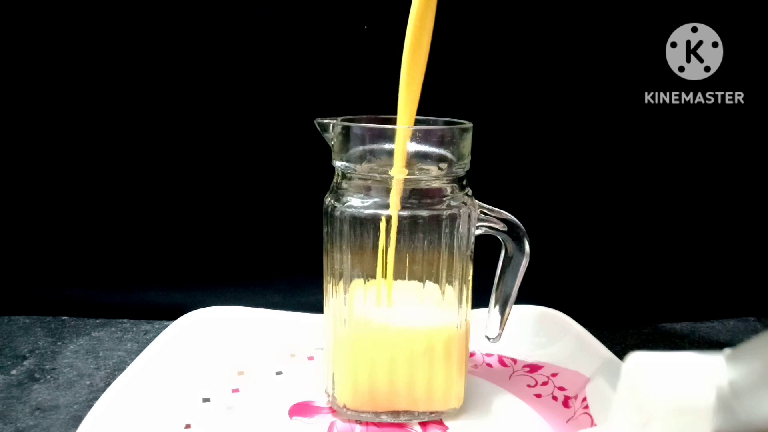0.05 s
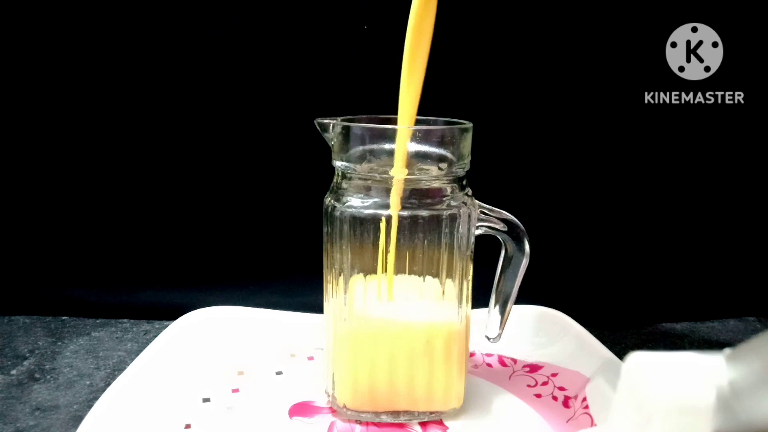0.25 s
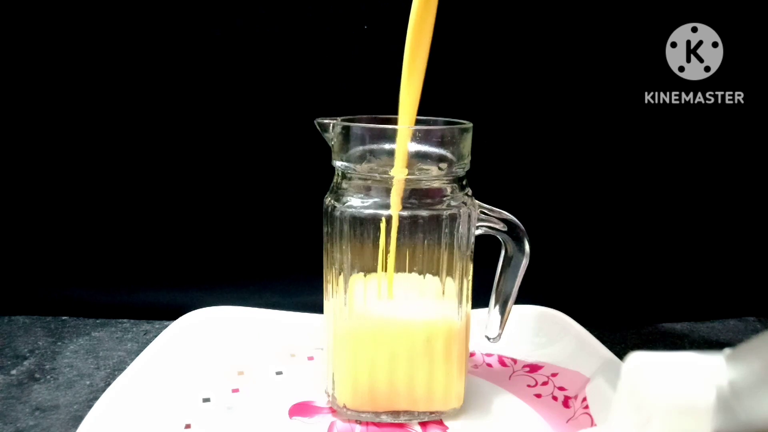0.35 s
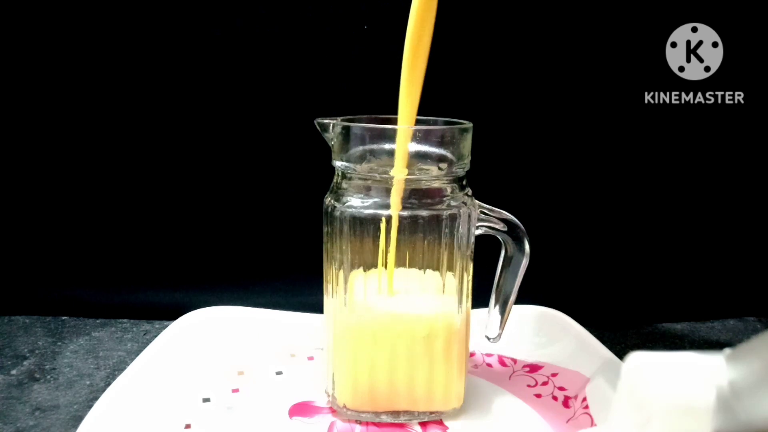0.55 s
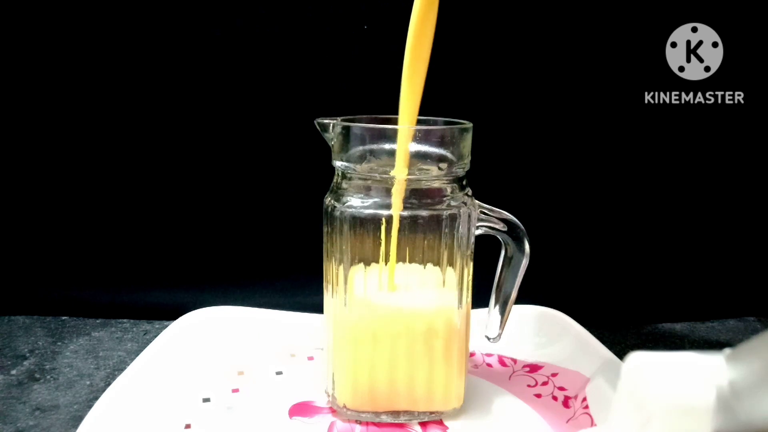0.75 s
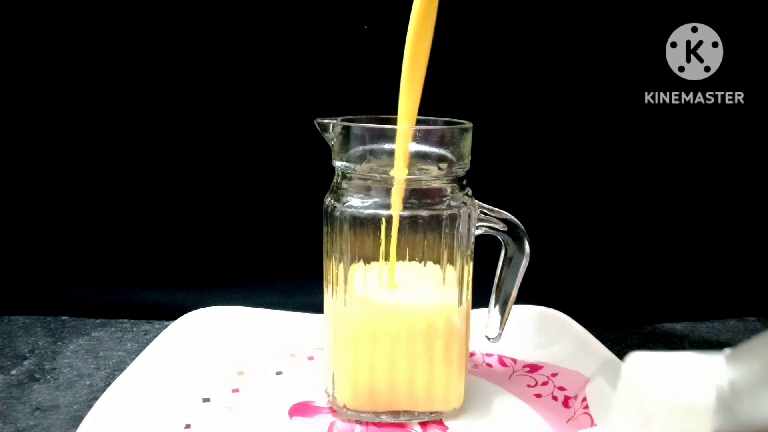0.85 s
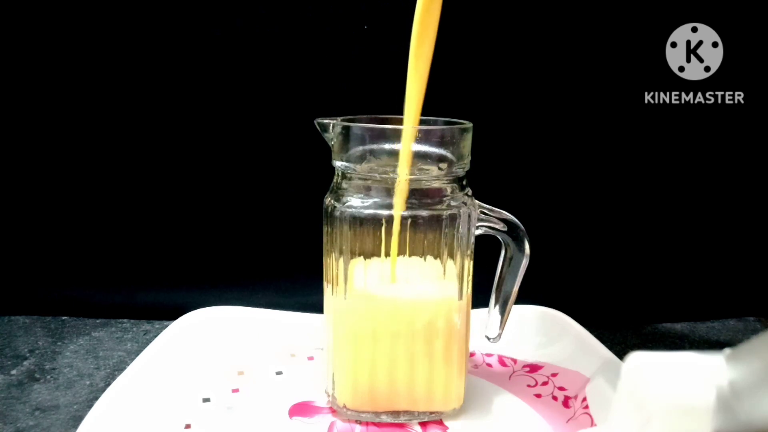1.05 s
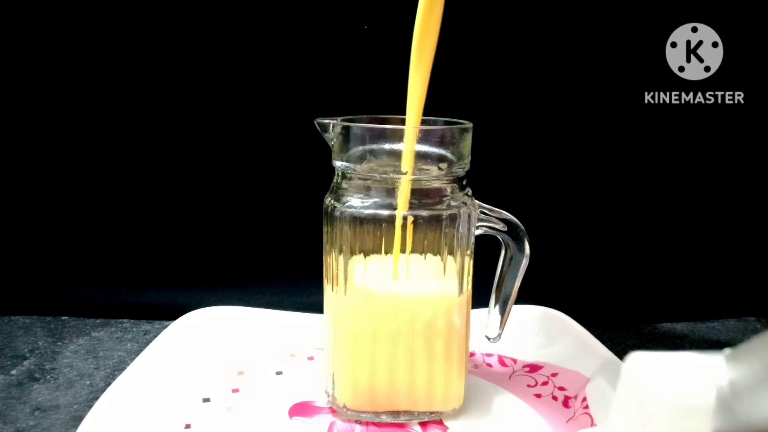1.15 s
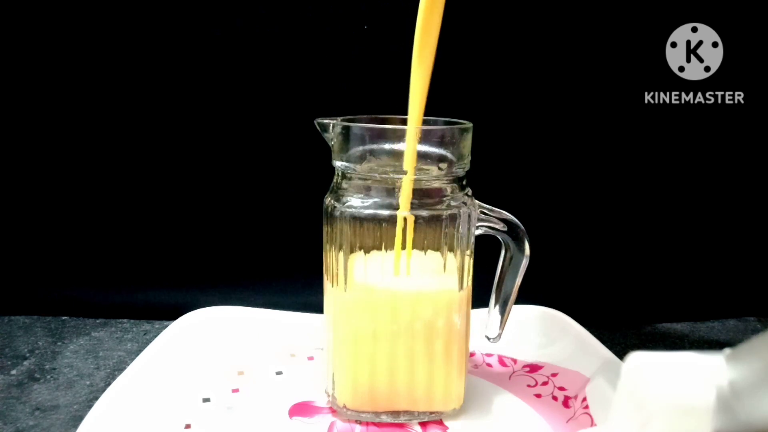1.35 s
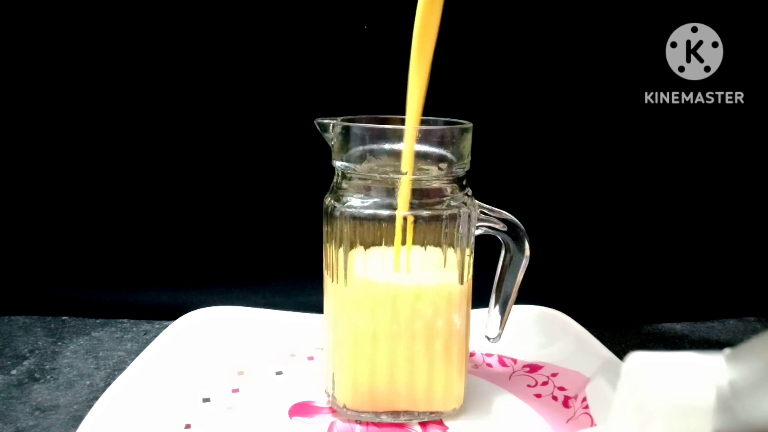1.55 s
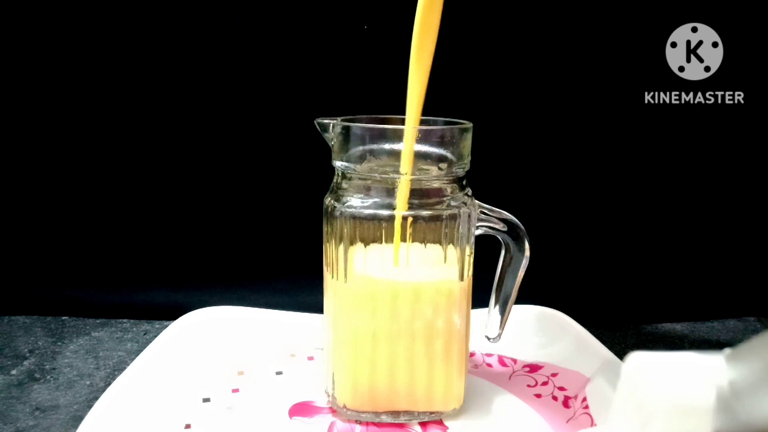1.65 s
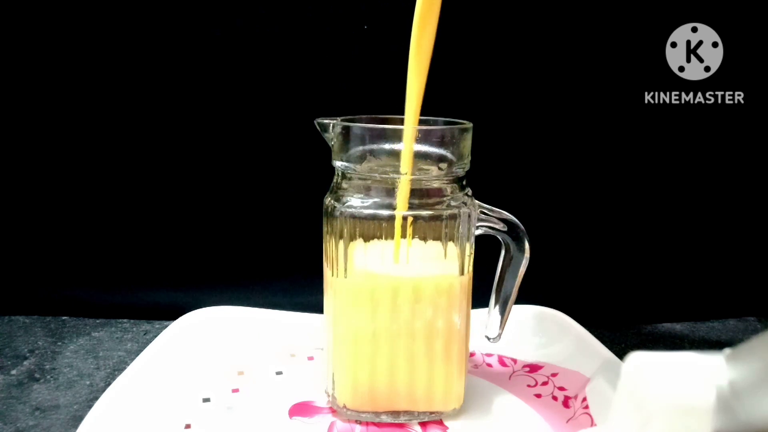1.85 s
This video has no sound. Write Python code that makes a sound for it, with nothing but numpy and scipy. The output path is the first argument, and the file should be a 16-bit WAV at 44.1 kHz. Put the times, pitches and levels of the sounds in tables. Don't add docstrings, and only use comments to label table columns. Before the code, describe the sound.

A thick drink pours into a glass jug, close and dry. Only tiny drips until 0.2 s, then a loud cluster of hollow glugs and bright pops at 0.25-0.35. A brief lull near 0.4, sharp wet snaps at 0.5, 0.78 and 0.93, then rounder gulps and churning around 1.0-1.15. Softer, sparse plops, ticks and glassy trickling continue to 1.9 s over faint hum and hiss.

```python
import sys
import numpy as np
from scipy import signal
from scipy.io import wavfile
from scipy.ndimage import uniform_filter1d

SR = 44100
rng = np.random.default_rng(int(sys.argv[2]) if len(sys.argv) > 2 else 0)


def dump_mix(stems):
    frames = np.atleast_2d(stems).T
    limited = np.clip(frames, -1, 1)
    pcm = np.round(limited * 32767).astype(np.int16)
    wavfile.write(sys.argv[1], SR, pcm)


def invert_db(level):
    return 10 ** (np.asarray(level, dtype=float) / 20)


N = 83790

# (time [s], peak level [dB], pitch [Hz], t60 [s])
GULPS = [(0.2612, -17, 1184, 0.094), (0.318, -25.5, 807, 0.062), (0.329, -13.5, 746, 0.015),
         (0.332, -16.5, 3120, 0.028), (0.343, -13, 692, 0.06), (0.37, -20, 737, 0.044),
         (0.496, -14.5, 968, 0.048), (0.694, -30.5, 1160, 0.036), (1.066, -17.5, 950, 0.049),
         (1.098, -27, 910, 0.037), (1.146, -12.5, 1012, 0.058), (1.226, -33.5, 1140, 0.13),
         (1.317, -34.5, 1216, 0.2), (1.377, -34.5, 1078, 0.061), (1.396, -29, 1018, 0.051),
         (1.412, -31, 1000, 0.035), (1.476, -25.5, 1020, 0.016), (1.49, -21.5, 1050, 0.0091),
         (1.506, -28, 1010, 0.011), (1.547, -24, 1067, 0.02), (1.58, -27.5, 1050, 0.02),
         (1.611, -28.5, 1160, 0.03), (1.629, -28.5, 1076, 0.11)]
# (time [s], peak level [dB], pitch [Hz])
PLOPS = [(0.0014, -25, 1546), (0.192, -26.5, 2080), (0.247, -20, 1683), (0.5665, -32.5, 1470),
         (0.6209, -32, 1750), (0.7771, -19, 1955), (0.7817, -20.5, 1481), (0.822, -41, 1590),
         (0.853, -30, 1550), (0.874, -42, 1420), (0.8952, -28, 1487), (0.9414, -22.5, 1590),
         (1.0213, -26.5, 1446), (1.037, -24.5, 2340), (1.068, -32, 1800), (1.094, -34, 1490),
         (1.1454, -19, 1431), (1.195, -38, 1050), (1.22, -40, 1570), (1.3944, -30.5, 1707),
         (1.4565, -32, 1320), (1.5956, -29.5, 1414), (1.6281, -25.5, 1547), (1.755, -40, 1980),
         (1.82, -38, 2550), (1.869, -33, 1110)]
# (time [s], peak level [dB], pitch [Hz])
POPS = [(0.1441, -28.5, 4480), (0.2455, -12.5, 3630), (0.2839, -14, 3600), (0.2982, -19.5, 4020),
        (0.3281, -0.5, 3560), (0.522, -35, 3200), (0.5366, -19, 3300), (0.5426, -18.5, 2890),
        (0.617, -19.5, 2550), (0.6685, -29, 4200), (0.6828, -26.5, 2670), (0.724, -30, 4340),
        (0.7326, -32, 2900), (0.759, -25, 3070), (0.7785, -5.5, 3560), (0.8386, -27, 2940),
        (0.8846, -22, 4860), (0.909, -21, 5130), (0.96, -30.5, 3480), (1.018, -26, 3600), (1.04, -26, 3030),
        (1.0905, -49, 2870), (1.1306, -31.5, 2850), (1.1454, -19.5, 3420), (1.1745, -24.5, 3140),
        (1.227, -28, 2840), (1.278, -32, 4600), (1.319, -43, 3100), (1.337, -56, 3070),
        (1.3512, -22.5, 3420), (1.376, -39, 3100), (1.412, -34, 2840), (1.4567, -25.5, 3030),
        (1.476, -18, 3300), (1.5305, -34, 3600), (1.5474, -33, 4000), (1.58, -51, 3070),
        (1.5963, -25.5, 3103), (1.648, -36, 2980), (1.6552, -26.5, 3370), (1.672, -30, 4280),
        (1.7262, -29, 3300), (1.752, -30, 3460), (1.859, -39, 3160), (1.8904, -23.5, 3300)]
# (time [s], peak level [dB], pitch [Hz])
SNAPS = [(0.2463, -20.5, 5300), (0.2839, -26.5, 5300), (0.3274, -12.5, 6020), (0.4281, -23.5, 9710),
         (0.5057, -37, 15300), (0.5071, -10.5, 6870), (0.5349, -19, 7500), (0.6447, -21.5, 6600),
         (0.6803, -30, 8930), (0.6999, -29, 5400), (0.7621, -29.5, 7900), (0.7796, -10, 5230),
         (0.84, -35, 5750), (0.8917, -24.5, 5700), (0.9102, -26, 8500), (0.9259, -8.5, 7640),
         (0.9962, -18.5, 9900), (1.0915, -27, 11040), (1.1245, -19, 13600), (1.2378, -32.5, 7450),
         (1.251, -27, 14100), (1.4883, -24.5, 12500), (1.5987, -27.5, 11700), (1.8035, -29, 11960),
         (1.8778, -35.5, 13400),
         (0.0113, -35.5, 9460), (0.0353, -38, 6670), (0.073, -43.5, 5100), (0.0988, -32, 6050),
         (0.19, -25.5, 7870), (0.1967, -28.5, 11000), (0.304, -22.5, 7100), (0.3338, -16, 5720),
         (0.379, -28.5, 9200), (0.4, -41, 10100), (0.464, -31, 14000), (0.5449, -21.5, 7700),
         (0.8078, -30.5, 7040), (0.9457, -23.5, 11500), (1.0047, -21.5, 9824), (1.1965, -32.5, 9000)]
# (time [s], peak level [dB], pitch [Hz])
SPRAY_TICKS = [(.022, -40, 12000), (.042, -45, 10300), (.083, -46, 8300), (.139, -36.5, 10600),
               (.172, -62, 13300), (.218, -37, 6600), (.2455, -18, 10600), (.2828, -21, 10600),
               (.3272, -10, 12100), (.5062, -9, 12500), (.531, -26, 11000), (.5365, -14, 11400),
               (.548, -25, 12100), (.557, -32, 11000), (.575, -37, 11000), (.649, -44, 13500),
               (.676, -28, 10900), (.725, -32, 8700), (.7387, -30.5, 9800), (.7665, -26, 12700),
               (.9612, -28, 12100), (1.04, -32.5, 9300), (1.0725, -50, 11100), (1.1433, -20.5, 9100),
               (1.18, -46, 12200), (1.2356, -38, 11500), (1.29, -35, 9400), (1.3194, -36.5, 10700),
               (1.3379, -50, 13600), (1.435, -44, 11500), (1.515, -39, 11300), (1.547, -44, 12100),
               (1.569, -43, 13100), (1.608, -48, 10850), (1.6387, -31.5, 10300), (1.648, -46, 12100),
               (1.714, -42.5, 14100), (1.761, -37.5, 13500), (1.857, -44, 11800)]
# (time [s], level [dB], start pitch [Hz], length
# [s], end pitch [Hz])
AIR_NECKS = [(0.245, -30.5, 720, 0.066, 790), (0.28, -15.5, 1160, 0.0076, 2400),
             (0.422, -36, 37, 0.1395, 38.4), (0.516, -38.5, 939, 0.09, 900), (0.565, -31, 912, 0.041, 1584),
             (0.595, -45, 1900, 0.013, 2400), (0.661, -53, 1830, 0.038, 1654),
             (0.527, -46.5, 3000, 0.076, 3050), (.729, -35, 1380, 0.012, 1830),
             (0.742, -36, 1570, 0.0084, 1700), (0.547, -52, 1570, 0.036, 1390),
             (0.7, -30, 1134, 0.02, 1240), (0.7, -42.5, 1865, 0.022, 2080),
             (1.001, -37.5, 1210, 0.027, 1390), (1.035, -26, 1255, 0.04072, 873),
             (1.128, -34, 921, 0.081, 1059), (1.6, -36.5, 715, 0.058, 634), (1.706, -42.5, 693, 0.085, 806),
             (1.783, -44.5, 1120, 0.116, 1348)]
# (time [s], level [dB])
SPLASH_VIGOUR = [(0, -58), (0.218, -60), (.26, -51.5), (.39, -46), (0.419, -81), (.49, -51), (.54, -42.5),
                 (.66, -54), (.76, -46.5), (.98, -41.5), (1.039, -33.5), (1.2, -46), (1.43, -47.5),
                 (1.621, -40), (1.69, -60), (1.74, -44.5), (1.9, -46)]
# (frequency [Hz], width [Hz], level [dB])
JUG_MODES = [(665, 130, -8), (1004, 66.7, 3.5), (1560, 670, 1.5), (3100, 90, 9.5), (3560, 154, 1.5)]
# (frequency [Hz], level per Hz [dB])
FLOOR_SPECTRUM = [(15, -37), (30, 6.5), (141, 12.5), (833, -5.5), (1090, -10), (3190, -16), (6590, -38.5),
                  (13300, -22), (16000, -28)]


def bubbles(rows, tick_db):
    rise_per_t60, attack_cycles, tick_s = 0.031, 0.35, 0.0006
    out, t = np.zeros(N), np.arange(SR // 5) / SR
    tick_len = SR // 100
    ticks = rng.standard_normal((len(rows), tick_len)) * np.exp(-t[:tick_len] / tick_s)
    for (s, db, hz, t60), tick in zip(rows, ticks):
        shape = (1 - np.exp(-t * hz / attack_cycles)) * invert_db(-60 * t / t60)
        ring = np.sin(2 * np.pi * hz * (t + rise_per_t60 * t * t / t60))
        add(out, s, invert_db(db) * shape / shape.max() * ring)
        width_hz = 1500 + 0.98 * hz
        coloured = resonate(tick, min(1.28 * hz, 14500), width_hz)
        coloured = resonate(coloured, min(1.29 * hz, 14500), width_hz)
        add(out, s, invert_db(db + tick_db) * (coloured + 0.091 * np.gradient(tick)))
    return out


def by_cycles(rows, cycles):
    return [(s, db, hz, cycles / hz) for s, db, hz in rows]


def air_necks():
    out = np.zeros(N)
    waver, wobble = invert_db(4.1 * drift(105)), 1 + 0.033 * drift(70)
    for s, db, hz, length, end_hz in AIR_NECKS:
        age = np.arange(int(length * SR)) / (length * SR)
        pitch = hz + (end_hz - hz) * age ** 1.805
        pitch = pitch * wobble[int(s * SR):][:len(age)]
        swell = np.sin(np.pi * age ** 0.54) ** 0.26
        add(out, s, invert_db(db) * swell * np.sin(2 * np.pi * np.cumsum(pitch) / SR))
    return out * waver


def grains(busy, per_s, low_hz, high_hz, cycles, rise):
    spread_db, slots = 7.5, N // 8
    clumps = invert_db(5 * drift(15)[:slots * 8:8])
    chance = 8 * per_s * busy[:slots * 8:8] * clumps / SR
    slot = np.flatnonzero(rng.random(slots) < chance)
    size, pitch, life, bend = rng.random((slots, 4))[slot].T[:, :, None]
    hz, t = low_hz * (high_hz / low_hz) ** pitch, np.arange(SR // 40) / SR
    age = t * hz / (cycles * (0.099 + life))
    level = invert_db(-spread_db * np.log(size + 0.095))
    shape = (1 - np.exp(-t * hz)) ** 2 * np.exp(-4 * age)
    glide = 1 + rise * (bend - 0.25) * np.minimum(age, 2)
    blips = level * shape * np.sin(2 * np.pi * hz * t * glide)
    out = np.zeros(N + SR)
    np.add.at(out, slot[:, None] * 8 + np.arange(len(t)), blips)
    return rms_one(out[:N])


def churn(vigour_db):
    knocks_per_s = 610
    force = np.clip(rng.standard_normal((len(JUG_MODES), N)) ** 3, -4, 4)
    knocks = force * (rng.random((len(JUG_MODES), N)) < knocks_per_s / SR)
    return invert_db(vigour_db - 5.5 + 7.14 * drift(19.8)) * rms_one(dull(jug(knocks), 5100))


def jug(trains):
    return sum(invert_db(db) * resonate(knocks, hz, width)
               for knocks, (hz, width, db) in zip(trains, JUG_MODES))


def boom(big):
    slosh = uniform_filter1d(np.abs(big), size=1800) * dull(rng.standard_normal(N), 680)
    return invert_db(17) * (resonate(slosh, 141, 13) + 0.33 * resonate(slosh, 231, 116))


def room(x):
    room_db, t60_s = -16, 0.025
    t = np.arange(SR // 4) / SR
    tail = dull(rng.standard_normal(len(t)), 7100) * invert_db(-60 * t / t60_s)
    tail = tail * (t > 0.003)
    return invert_db(room_db) * signal.fftconvolve(x, tail / np.sqrt(np.sum(tail ** 2)))[:N]


def floor():
    floor_db, flicker_db = -47, 1.5
    out, edges = 0, 22 * 2 ** np.arange(0, 9.6, 0.5)
    white = rng.standard_normal((2, N + SR))
    hz, db = np.transpose(FLOOR_SPECTRUM)
    for k, (low, high) in enumerate(zip(edges, edges[1:])):
        band_filter = signal.butter(2, [low, high], "band", fs=SR, output="sos")
        band = signal.sosfilt(band_filter, white[k % 2])[SR:]
        level_db = np.interp(np.log(low * high) / 2, np.log(hz), db)
        out = out + invert_db(level_db + flicker_db * drift(25)) * band
    return invert_db(floor_db) * rms_one(out)


def rms_one(x):
    return x / np.sqrt(np.mean(x ** 2) + 1e-20)


def drift(rate_hz):
    r = np.exp(-2 * np.pi * rate_hz / SR)
    slow = signal.lfilter([1], [1, -2 * r, r * r], rng.standard_normal(N + SR))[SR:]
    return rms_one(slow - slow.mean())


def resonate(x, hz, width_hz):
    r = np.exp(-np.pi * width_hz / SR)
    top = np.array([1, 0, -1]) * (1 - r * r) / 2
    return signal.lfilter(top, [1, -2 * r * np.cos(2 * np.pi * hz / SR), r * r], x)


def dull(x, cut_hz):
    return signal.sosfilt(signal.butter(4, cut_hz, fs=SR, output="sos"), x)


def add(out, s, sound):
    i = max(int(s * SR), 0)
    out[i:i + len(sound)] += sound[:max(len(out) - i, 0)]


def scene():
    s, db = np.transpose(SPLASH_VIGOUR)
    vigour_db = np.interp(np.arange(N) / SR, s, db)
    swing_db = vigour_db - vigour_db.mean()

    big = invert_db(3.6 * drift(40)) * bubbles(GULPS, tick_db=-1)
    big = big + bubbles(by_cycles(PLOPS, 68), tick_db=1.5) + air_necks()
    small = bubbles(by_cycles(POPS, 41.8), tick_db=-6)
    small = small + bubbles(by_cycles(SNAPS, 56), tick_db=2.5)
    small = small + bubbles(by_cycles(SPRAY_TICKS, 20), tick_db=6)

    aftermath_s, aftermath_gain = 0.012, 100
    keep = np.exp(-1 / (aftermath_s * SR))
    aftermath = signal.lfilter([1 - keep], [1, -keep], np.abs(small))
    busy = invert_db(0.55 * swing_db) + aftermath_gain * aftermath
    fizz = invert_db(vigour_db - 4) * grains(busy, 400, 945.6, 7440, cycles=69, rise=0.08)
    spray = invert_db(vigour_db - 17.5) * grains(busy, 450, 4480, 13600, cycles=20, rise=0.05)

    drink = big + small + fizz + spray + churn(vigour_db) + boom(big)
    return (drink + room(drink) + floor())[None]


def roll_off(x):
    return signal.sosfilt(signal.butter(12, 16770, fs=SR, output="sos"), x)


def record(dry):
    hush_from_s, hush_to_s, hush_db = 0.404, 0.427, -14
    t = np.arange(N) / SR
    hushed = (t > hush_from_s) & (t < hush_to_s)
    gate = invert_db(uniform_filter1d(hush_db * hushed, size=60))
    low = signal.sosfiltfilt(signal.butter(2, 1800, fs=SR, output="sos"), dry)
    rounded = np.tanh(low + gate * (dry - low))
    mix = signal.sosfilt(signal.cheby2(12, 50, 16300, fs=SR, output="sos"), rounded)
    return roll_off(mix)


dry = scene()
out = record(dry)
dump_mix(out)
```